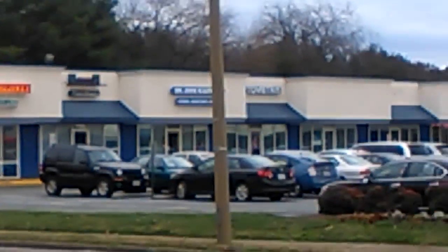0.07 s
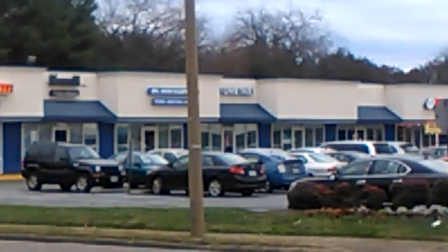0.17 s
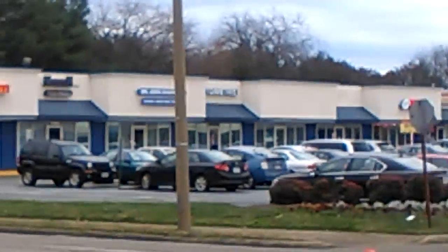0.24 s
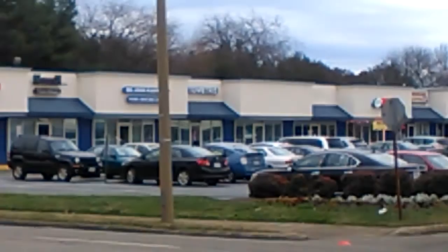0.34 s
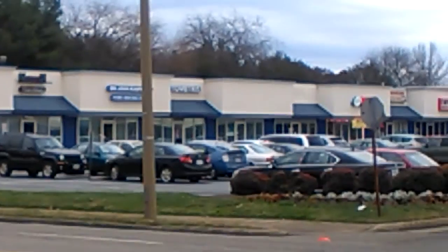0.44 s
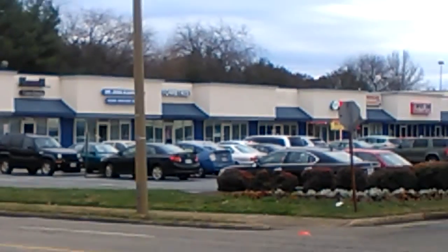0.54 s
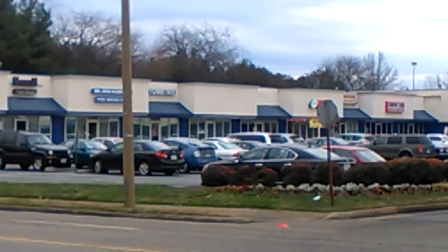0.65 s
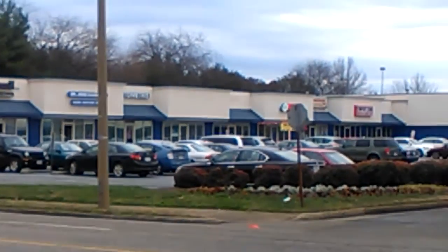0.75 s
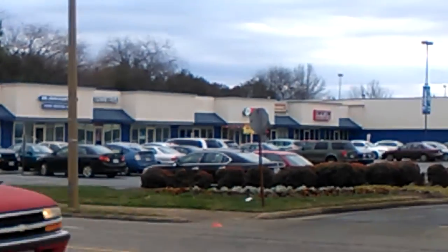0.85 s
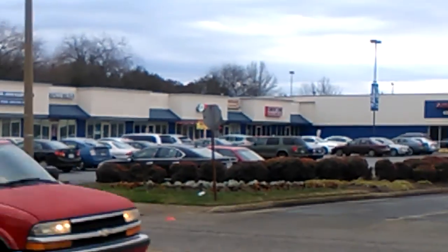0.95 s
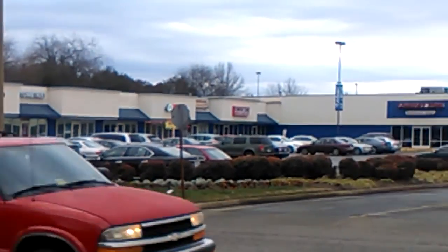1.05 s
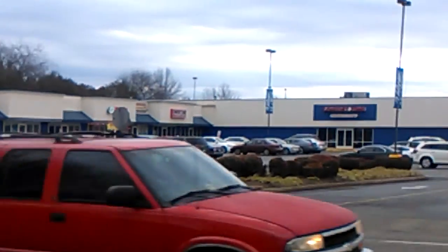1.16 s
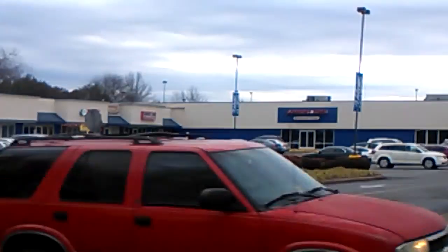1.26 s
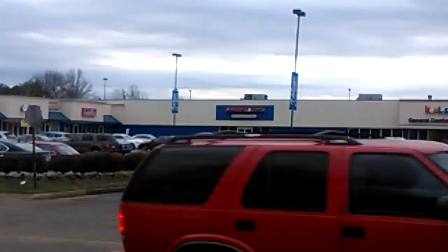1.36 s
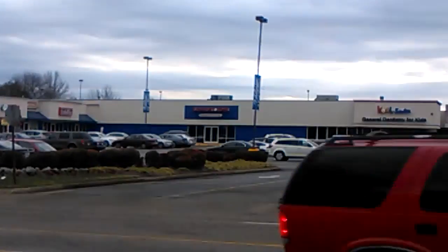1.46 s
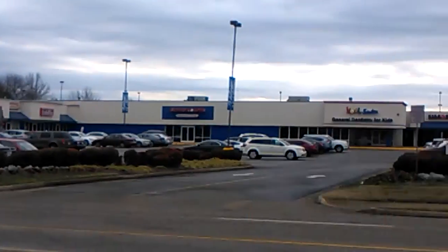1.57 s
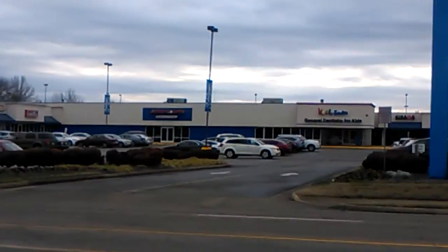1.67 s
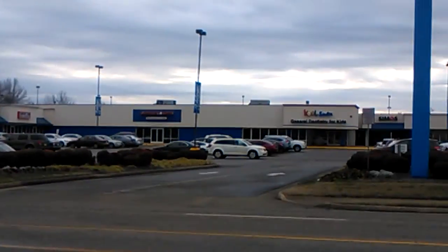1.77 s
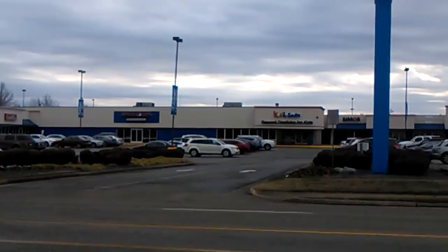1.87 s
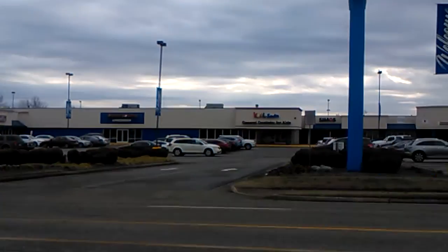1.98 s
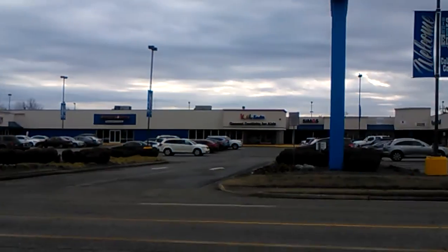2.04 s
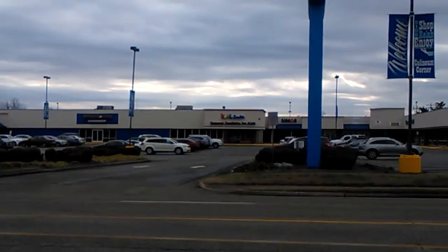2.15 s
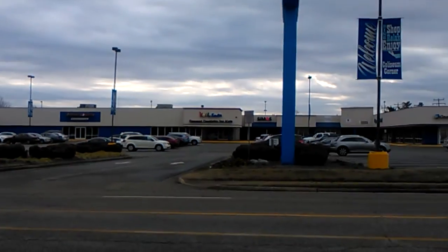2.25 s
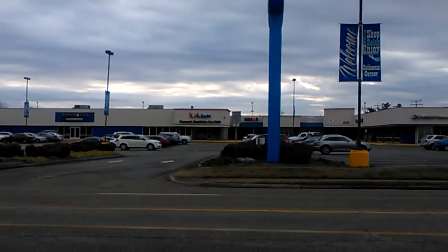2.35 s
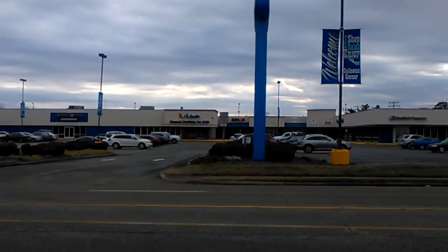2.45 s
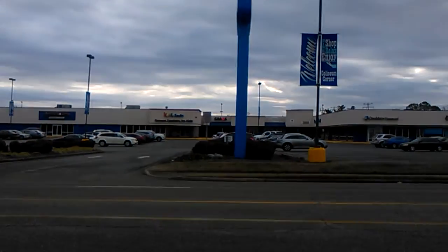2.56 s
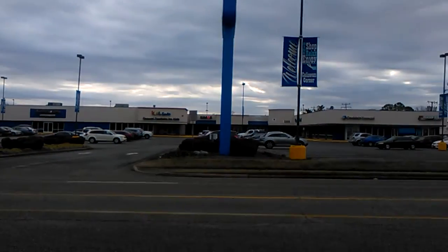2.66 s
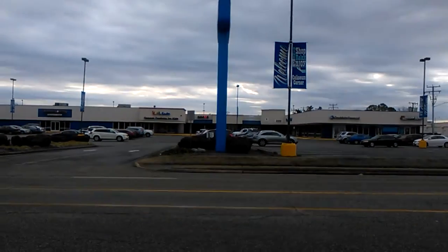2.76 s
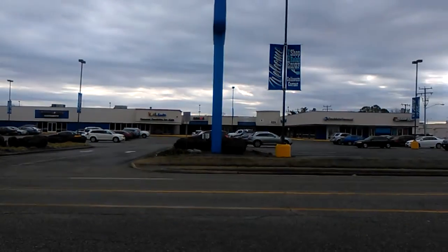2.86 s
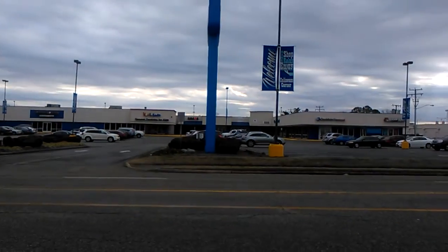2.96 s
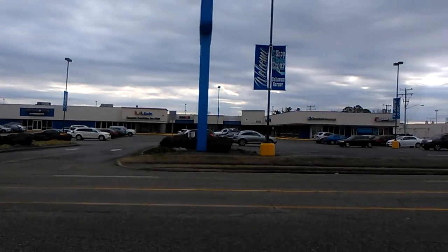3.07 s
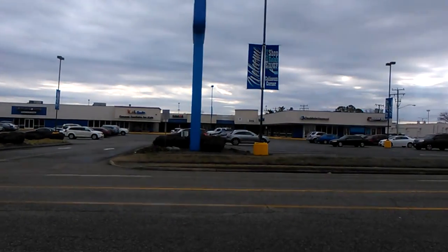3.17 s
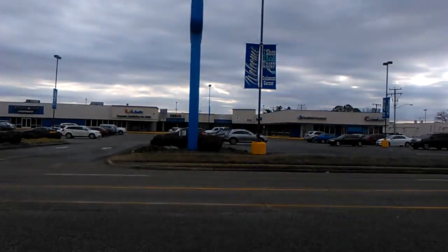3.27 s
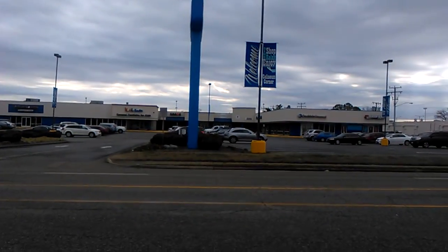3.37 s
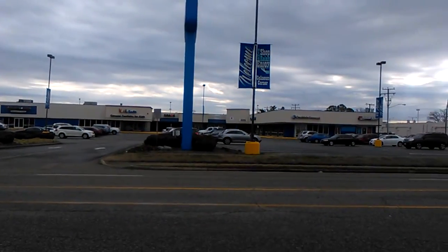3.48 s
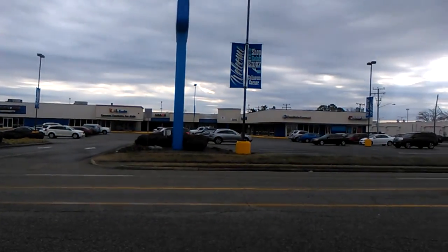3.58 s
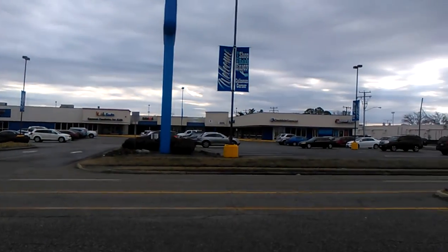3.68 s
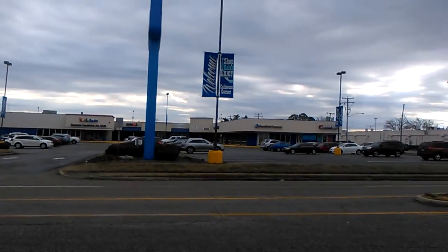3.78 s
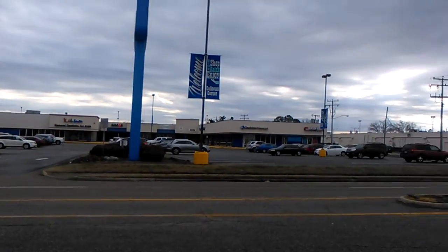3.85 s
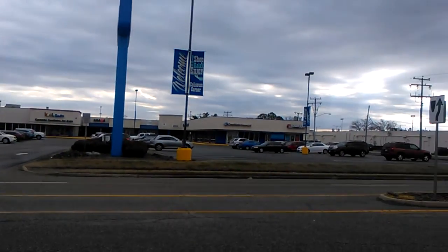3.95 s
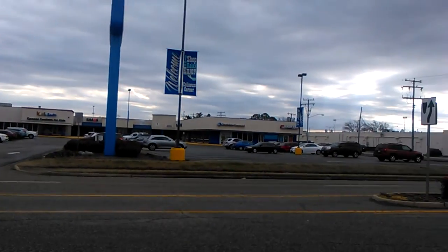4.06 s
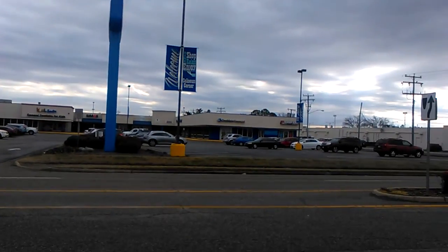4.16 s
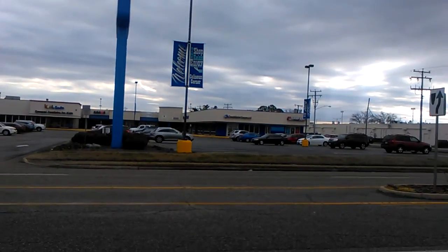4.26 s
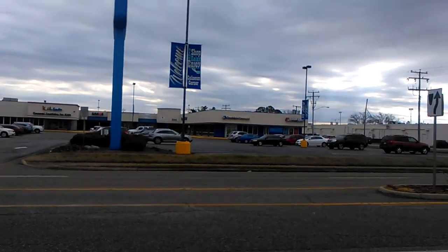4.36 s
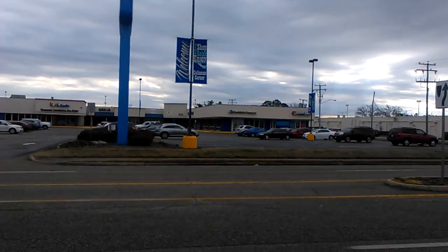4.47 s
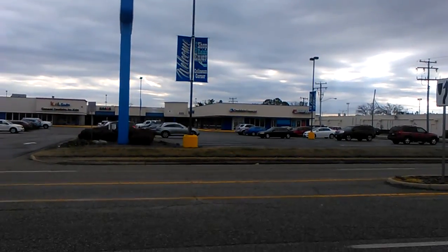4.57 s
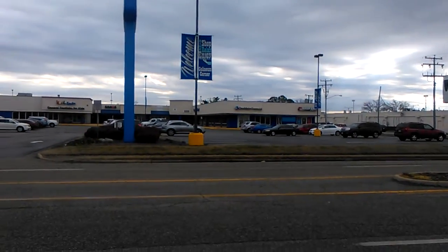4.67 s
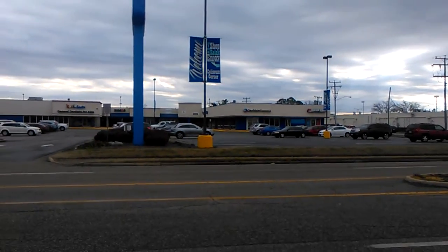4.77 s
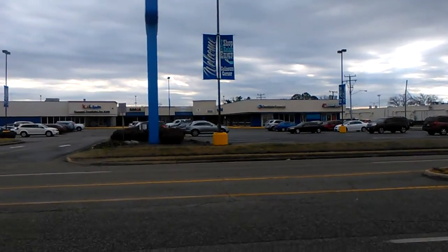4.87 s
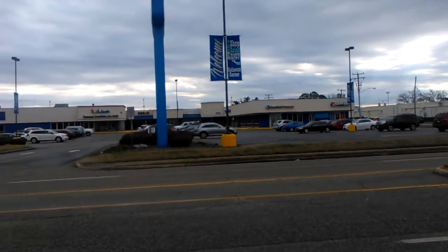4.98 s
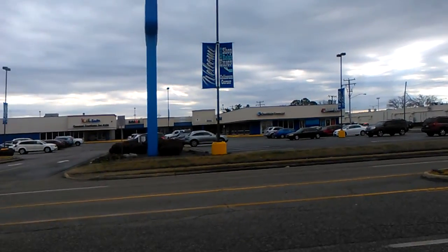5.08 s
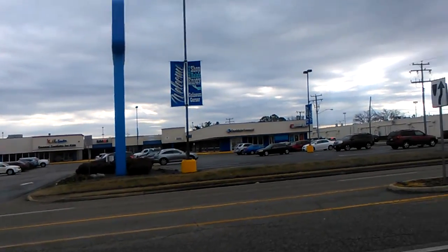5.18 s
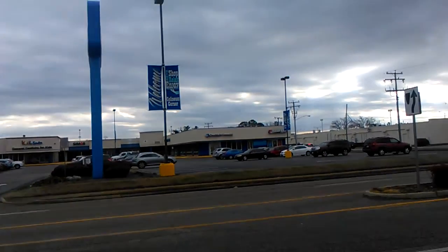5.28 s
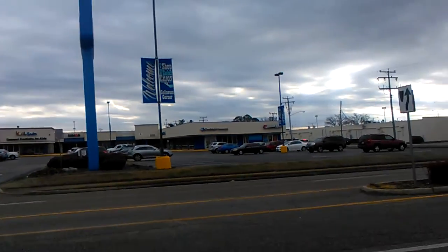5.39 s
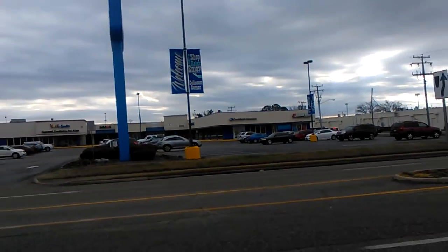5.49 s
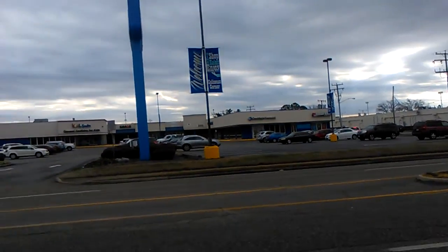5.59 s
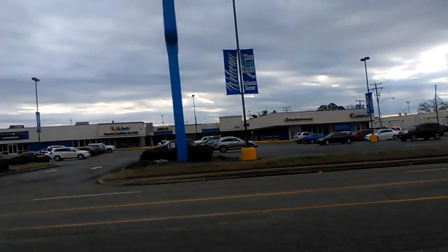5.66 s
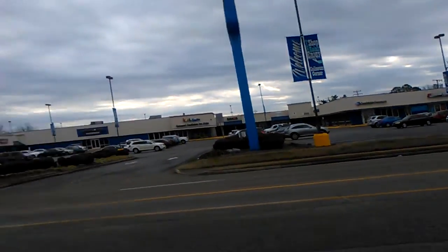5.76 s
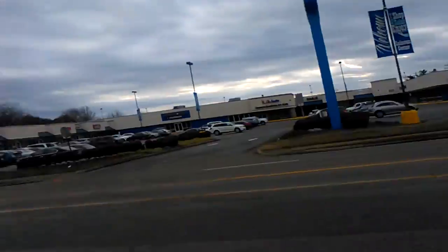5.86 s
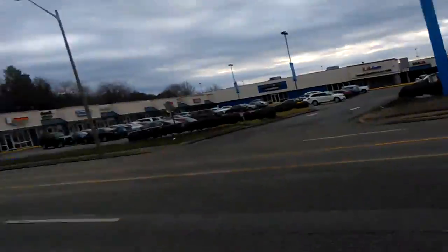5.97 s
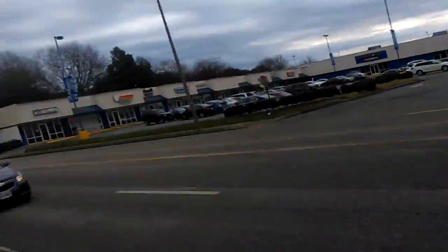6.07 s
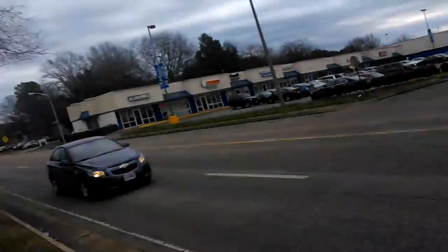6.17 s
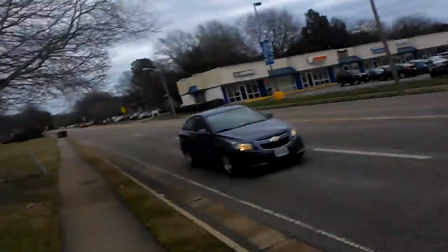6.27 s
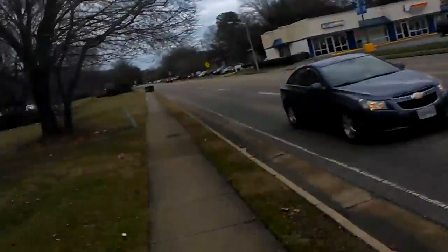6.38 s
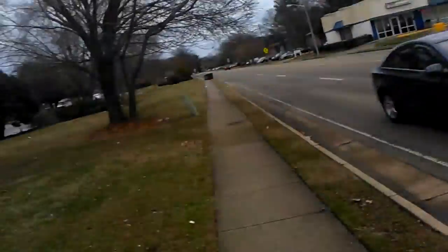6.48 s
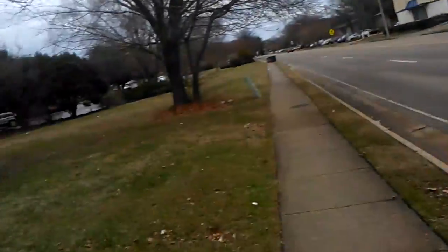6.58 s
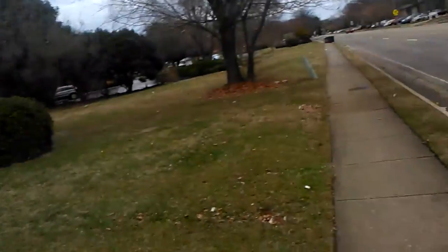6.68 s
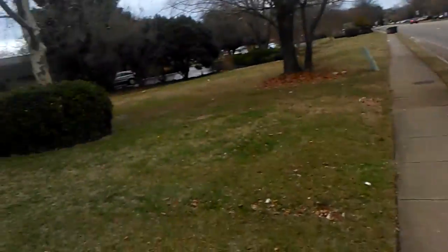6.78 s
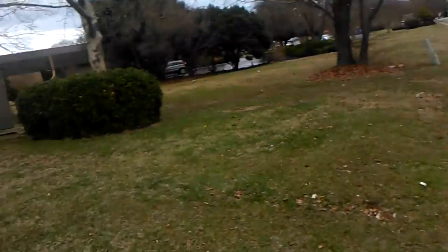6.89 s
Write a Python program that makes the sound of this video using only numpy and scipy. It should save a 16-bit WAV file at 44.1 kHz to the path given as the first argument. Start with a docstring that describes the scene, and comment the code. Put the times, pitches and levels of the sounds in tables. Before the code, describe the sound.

Handheld microphone beside an open multi-lane road. Broad tyre roar with a low engine drone swells, passes and recedes within three seconds. A quiet middle holds soft distant traffic, faint hiss, low thumps and sharp plastic handling ticks. Another vehicle approaches, with brief engine hums, growing into a bright rush that is only just starting to ease when it stops.

```python
"""Tyre roar of two cars passing a hand-held camera at the kerb of a wide road: filtered noise whose spectrum
blends between the sides of each car. The first engine, two harmonically related tones, drops in pitch as it
goes by; the second car's engine hums briefly as it comes near. Bodies and exhausts rumble as low noise.
The camera case ticks as decaying modes, far traffic and a treble hiss are coloured noise,
and the camera electronics whine faintly as steady high tones."""
import sys
import numpy as np
from scipy import signal
from scipy.fft import rfft, irfft, next_fast_len
from scipy.io import wavfile
from scipy.ndimage import uniform_filter1d, map_coordinates

SR = 44100
rng = np.random.default_rng(int(sys.argv[2]) if len(sys.argv) > 2 else 0)


def generate_wav(signal):
    """Clip the signal to [-1, 1] and save it as 16-bit WAV at the path in sys.argv[1]."""
    frames = np.transpose(np.atleast_2d(signal))
    scaled = np.clip(frames, -1, 1) * 32767
    pcm = np.round(scaled).astype(np.int16)
    wavfile.write(sys.argv[1], SR, pcm)


N = 305609
HOP = 128  # samples between spectral frames
T = np.arange(N) / SR
HZ = np.fft.rfftfreq(8 * HOP, 1 / SR)[:, None]
FRAMES = np.arange(N // HOP + 9) * HOP / SR

# Spectral densities below are relative: rush() normalises each to unit power.
# Tyre roar of each car: t/s, level/dB, treble lift/dB (reached in full from 8 kHz up)
FIRST_TYRES = [(0, -27.5, -6.5), (.6, -24.5, -2), (1.05, -22, 1), (1.3, -19.5, -1.5), (1.65, -22.5, -1),
               (1.85, -27.5, 4.5), (2.25, -36, 3.5), (2.55, -37.5, -5.5), (3, -43, -8), (3.3, -53.5, -3)]
SECOND_TYRES = [(3.5, -57.5, 2), (4.2, -43, -7), (4.55, -44.5, 0), (4.9, -39.5, -3.5), (5.2, -37, 0),
                (5.5, -36.5, 2), (5.85, -32.5, 0), (6.1, -25.5, 3.5), (6.35, -24, -1.5), (6.65, -24.5, 4.5),
                (6.93, -27.5, 1.5)]
# Side of the first car heard: t/s, side (0 front, 1 front quarter, 2 flank, 3 rear)
FIRST_TURN = [(.4, 0), (1.1, 1.19), (1.55, 2), (2.2, 3)]
# Side of the second car heard: t/s, side (0 far, 1 front, 2 front quarter, 3 flank)
SECOND_TURN = [(4.2, 0.27), (5.3, 0.41), (5.75, 0.79), (6.1, 1.4), (6.35, 2.05), (6.75, 2.99)]
# Tyre spectra, one list per side in the order above: f/Hz, density/dB per Hz
FIRST_SIDES = [
    [(260, -43), (450, -36), (570, -34), (652, -18), (930, 0), (1430, -10.5), (1810, -6), (2190, -11),
     (2780, -34), (3740, -28.5), (4270, -31), (5340, -25.5), (7180, -37), (8960, -45), (15500, -62)],
    [(260, -46), (450, -17), (596, -15), (802, -6.5), (1110, -0.5), (1560, -14), (2070, -11.5), (2550, -24),
     (3000, -22.5), (3800, -32), (4270, -42), (5030, -36.5), (6760, -34.5), (9510, -51.5), (15500, -62)],
    [(260, -52), (450, -13.5), (554, -18.5), (652, -4), (838, -2.5), (916, -8.5), (1030, -1.5), (1430, -19),
     (2010, -13.5), (2260, -18), (3270, -22.5), (4960, -32), (5580, -28), (6190, -36.5), (15500, -53)],
    [(440, -8), (750, -6.5), (884, -10.5), (1020, 2), (1180, 1), (1580, -7), (1800, -38), (2090, -11),
     (2260, -23), (2500, -17), (3390, -20), (3990, -26), (5480, -23), (6980, -45.5), (15500, -59)],
]
SECOND_SIDES = [
    [(290, -36), (500, -3.5), (629, -4), (706, 4), (803, -1.5), (968, 2.5), (1350, -24.5), (1620, -10.5),
     (1800, -3), (2130, -19), (3190, -23.5), (3630, -29), (5750, -43), (14200, -57), (15500, -56)],
    [(290, -39), (500, -8), (545, -5.5), (686, -12), (716, -6), (769, -10.5), (982, -2), (1150, -7),
     (1620, -2), (2130, -6), (2330, -13), (3100, -32), (3530, -36), (5280, -31.5), (15500, -65)],
    [(290, -38), (500, -28), (611, -28), (726, -12), (1060, -5), (1220, -2.5), (1770, -10.5), (1880, -18),
     (2390, -10), (3100, -32.5), (4250, -39), (4570, -42), (6090, -36.5), (10800, -54), (15500, -56)],
    [(290, -37), (500, -2), (569, -8), (876, 3.5), (1560, -17), (1850, -10.5), (2010, -20), (2290, -10),
     (3280, -22.5), (3580, -24), (3850, -29), (5750, -35.5), (6360, -39.5), (8720, -40), (15500, -66)],
]
# Ripple in the leaving first car's hiss: f/Hz, level/dB
REAR_BANDS = [(2500, 4), (3000, -11), (3500, -2.5), (4000, -6), (4500, 0), (4850, -7), (5200, 0.5),
              (6700, -5)]
# Moving band in each car's hiss, a dark gap where negative: t/s, f/Hz, level/dB
FIRST_GAP = [(0, 4280, -3), (1.2, 4300, -3), (1.45, 5350, -8), (1.6, 6600, -1.5), (2.4, 6800, 4)]
SECOND_GAP = [(4.6, 4760, 3), (5.1, 4470, -9), (5.45, 4750, 2), (5.8, 4500, -12), (6.15, 3500, -6),
              (6.4, 5040, -6), (6.93, 8650, -4)]
# The second car's tread band slides down and is strongest early in the slide
BAND_HIGH_HZ, BAND_LOW_HZ, BAND_MID_S, BAND_GLIDE_S = 1880, 850, 6.3, 0.23
BAND_DB, BAND_PEAK_S, BAND_SWELL_S = 7.5, 6.104, 0.18
# A bright band rides above the second car's gap, at a fixed frequency ratio to it
CREST_OVER_GAP, CREST_DB, CREST_S, CREST_HALF_S = 1.4, 3.5, 6.08, 0.25

# First engine: firing tone before glide and sag, fractional shift either way, middle and width of the glide
FIRING_HZ, DOPPLER, PASS_S, PASS_GLIDE_S, SAG_HZ_PER_S = 96.5, 0.03494, 1.75, 0.25, 2.2
SECOND_ORDER_DB = -1  # over the firing tone
# First engine before its final fade: t/s, level/dB
ENGINE_LEVEL = [(0, -49), (.7, -43.5), (1.44, -32.5), (1.6, -40.5), (2, -35), (2.45, -46.5), (2.75, -43),
                (3, -64), (3.46, -51.5), (4.2, -66)]
# Hums of the second car's engine: t/s, half length/s, f/Hz, glide/(Hz per s), level/dB
HUMS = [(4.05, .35, 62.5, -4, -47), (5.089, .1, 146, -8.5, -48.5), (5.426, 0.048, 153, -5.5, -44.5)]

# Rumble in two layers, drone and deep part: f/Hz, density/dB per Hz
DRONE = [(70, -40), (105, -5), (130, -2.5), (190, -0.5), (240, 1), (330, -6), (420, -11), (520, -15.5),
         (800, -59), (1600, -200)]
DEEP = [(20, -53), (35, -3), (50, 1.5), (65, 4), (100, 5), (130, -22), (200, -79)]
# Brief swells of the rumble: t/s, half length/s, drone level/dB, deep level/dB
THUDS = [(.26, 0.069, -52, -39.5), (2.093, 0.22, -37.5, -42), (4.26, 0.075, -44.5, -46),
         (5.317, 0.23, -42, -42.5), (5.687, 0.14, -41, -38.5), (5.957, 0.039, -35.5, -33.5),
         (6.822, 0.064, -28, -53)]
# Bodies and exhausts over the tyre level: drone/dB, deep part/dB, drone tilt/(dB per octave)
FIRST_BODY, SECOND_BODY = (-9, -15, -1.2), (-11, -16, 7.6)
FAR_DRONE_DB, FAR_DEEP_DB, FAR_TILT_DB = -50.5, -46.5, -4  # far traffic's share, tilt in dB per octave
EXHAUST_LAG_S = 0.16

# Ticks of the case: t/s, level/dB, low modes/dB, high-mode tilt/(dB per octave), crack/dB, crack t60/ms
TICKS = [(2.929, -21, 9, -.5, -17, 9.2), (2.9372, -24.5, -5, -3, -20, 6), (4.4703, -21.5, -12, -17, 4, 3.1)]
# Modes of the plastic case, the first three low: f/Hz, level/dB, t60/s
CASE = [(2800, -5, .012), (3380, 1, .016), (3900, -15, .025), (5370, -6, .007), (6170, -2, .008),
        (7300, -10, .008), (8380, -7, .01), (11000, -11, .006)]

# Far traffic: f/Hz, density/dB per Hz
FAR = [(180, -38), (300, -11), (435, -11), (520, -9), (743, -5.5), (829, -10), (938, -4), (1500, -4.5),
       (2820, -23), (8000, -47), (10400, -80), (17600, -120)]
# Far traffic: t/s, level/dB
FAR_LEVEL = [(0, -50), (3.4, -50), (3.9, -48.5), (4.6, -52), (6.93, -54)]
# Treble hiss: f/Hz, density/dB per Hz
HISS = [(3000, -60), (5000, -1), (7000, 0), (11000, -5.5), (15500, -19)]
# Treble hiss beside each car: t/s, half length/s, level/dB
BESIDE = [(1.48, 0.19, -61), (6.66, 0.18, -60)]
# The treble hiss comes and goes: peak t/s, level/dB, rise/s, time to fall 20 dB/s
PUFFS = [(2.0, -63.5, .2, 1.1), (2.96, -64, .02, 0.16), (3.32, -73, 0.038, 0.6), (3.57, -73.5, 0.097, .3),
         (4.52, -67, .03, 0.2), (4.8, -74, .05, 8), (5.04, -67.5, 0.14, 0.5), (5.35, -67.5, 0.1, 2),
         (5.75, -66, 0.068, .25), (5.93, -64, .07, .5)]
# Whine of the electronics: f/Hz, rms level/dB
WHINE = [(13800, -91), (14000, -87), (14200, -91)]
# Microphone hiss: f/Hz, density/dB per Hz
SELF_NOISE = [(2000, -40), (5000, -7), (15500, -2)]
TOP_HZ = 15850  # band limit


def cars():
    """Superposition: one car's roar fades into the distance while the next draws near."""
    # spectral ripple of the first car sets in as it leaves
    rear = np.clip((FRAMES - 1.9) / 0.47, 0, 1)
    first_extra_db = rear * sum(db * bump(hz, 0.041) for hz, db in REAR_BANDS)
    gap_hz, gap_db = curves(FIRST_GAP, FRAMES)
    first_extra_db = first_extra_db + gap_db * bump(gap_hz, 0.076)

    slide = (1 + np.tanh((FRAMES - BAND_MID_S) / BAND_GLIDE_S)) / 2
    band_hz = BAND_HIGH_HZ * (BAND_LOW_HZ / BAND_HIGH_HZ) ** slide
    band_db = BAND_DB * bell(FRAMES, BAND_PEAK_S, BAND_SWELL_S)
    gap_hz, gap_db = curves(SECOND_GAP, FRAMES)
    crest_db = CREST_DB * bell(FRAMES, CREST_S, CREST_HALF_S)
    second_extra_db = band_db * bump(band_hz, 0.17) + gap_db * bump(gap_hz, 0.12)
    second_extra_db = second_extra_db + crest_db * bump(CREST_OVER_GAP * gap_hz, 0.16)

    first_gain, second_gain = nearness(T)
    first = first_gain * tyres(FIRST_TYRES, FIRST_TURN, FIRST_SIDES, first_extra_db)
    second = second_gain * tyres(SECOND_TYRES, SECOND_TURN, SECOND_SIDES, second_extra_db)
    return first + second


def tyres(level, turn, sides, extra_db):
    """Directivity: tread noise has a spectrum for each side of the car, blended in dB as the car turns by."""
    side, = curves(turn, FRAMES)
    side = np.clip(side, 0, len(sides) - 1)
    colour_db = sum(along(s, HZ) * np.clip(1 - abs(side - k), 0, 1) for k, s in enumerate(sides))
    lift_db = curves(level, FRAMES)[1] * along([(2500, 0), (8000, 1.0), (15500, 1.0)], HZ)
    flutter_db = 0.78 * wobble(9) + 0.71 * wobble(25)
    return amp(flutter_db) * rush(colour_db + lift_db + extra_db, patchy_db=1.0, streaky_db=1.5)


def first_engine():
    """Doppler effect: a six-cylinder firing order and, two thirds as high, the second shaft order glide down."""
    shift = 1 - DOPPLER * np.tanh((T - PASS_S) / PASS_GLIDE_S)
    hz = (FIRING_HZ - SAG_HZ_PER_S * (T - PASS_S)) * shift
    phase = 2 * np.pi * np.cumsum(hz * (1 + 0.0033 * wobble(8.6))) / SR
    firing = amp(2.2 * wobble(7.07)) * np.sin(phase)
    second_order = amp(SECOND_ORDER_DB + 1.4 * wobble(6.3)) * np.sin(phase * 2 / 3)
    fade = np.clip((4.5 - T) / 0.43, 0, 1)
    return np.sqrt(2) * amp(curves(ENGINE_LEVEL, T)[0]) * fade * (firing + second_order)


def second_engine():
    """Frequency modulation: each brief hum is a swelling sine with a gliding, unsteady pitch."""
    out = np.zeros(N)
    for s, half_s, hz, glide, db in HUMS:
        pitch = (hz + glide * (T - s)) * (1 + 0.0149 * wobble(7.5))
        gain = bell(T, s, half_s) * amp(db + 1.4 * wobble(5.95))
        out += gain * np.sin(2 * np.pi * np.cumsum(pitch) / SR)
    return np.sqrt(2) * out


def rumble():
    """Incoherent power addition: low noise of bodies, exhausts, far traffic and brief swells in two layers."""
    near = nearness(T - EXHAUST_LAG_S)  # a little late, since exhausts point back
    swells = [bell(T, s, half_s) for s, half_s, _, _ in THUDS]
    gains = []
    for k, far_db in enumerate([FAR_DRONE_DB, FAR_DEEP_DB]):
        bodies = [g * amp(body[k]) for g, body in zip(near, [FIRST_BODY, SECOND_BODY])]
        thuds = [g * amp(row[2 + k]) for g, row in zip(swells, THUDS)]
        gains.append(together(bodies + [amp(far_db)] + thuds))
    drone_gain, deep_gain = gains

    first, second = nearness(FRAMES)
    far = amp(-42.0)  # tyre level at which a car's colour takes over from far traffic
    tilt = first * FIRST_BODY[2] + second * SECOND_BODY[2] + far * FAR_TILT_DB
    tilt = tilt / (first + second + far)
    drone_db = along(DRONE, HZ) + tilt * np.log2((HZ + 1) / 220)
    lumps_db = 0.9 * wobble(13) + 0.6 * wobble(4.5)
    drone = amp(lumps_db) * rush(drone_db, patchy_db=1.84)
    deep = rush(along(DEEP, HZ), patchy_db=0.5)
    return drone_gain * drone + deep_gain * deep


def ticks():
    """Modal decay: a noise crack, ringing modes of the plastic case and a faint return from the surroundings."""
    out, t = np.zeros(N + SR), np.arange(SR // 4) / SR
    slow = 1 - np.exp(-(t / 0.0026) ** 2)  # the low modes build up later
    fast = 1 - np.exp(-t / 0.0009)
    for s, db, low_db, tilt_db, crack_db, crack_ms in TICKS:
        low = sum(mode(t, hz, level, t60) for hz, level, t60 in CASE[:3])
        high = sum(mode(t, hz, level + tilt_db * np.log2(hz / 6000), t60) for hz, level, t60 in CASE[3:])
        crack = amp(crack_db - 60 * t / crack_ms * 1000) * np.diff(rng.standard_normal(len(t) + 1))
        echo = amp(-31 - 60 * t / 0.1) * uniform_filter1d(rng.standard_normal(len(t)), size=5)
        tick = amp(low_db) * slow * low + fast * (high + crack) + echo
        out[round(s * SR):][:len(t)] += amp(db) * tick
    return out[:N]


def mode(t, hz, level_db, t60):
    """Damped resonance: a sine that decays by 60 dB in t60 seconds."""
    return amp(level_db - 60 * t / t60) * np.sin(2 * np.pi * hz * t)


def far_traffic():
    """Superposition of many distant sources, modelled as patchy, streaky coloured noise."""
    return amp(curves(FAR_LEVEL, T)[0]) * rush(along(FAR, HZ), patchy_db=2.0, streaky_db=3.5)


def treble_hiss():
    """Amplitude modulation: high noise swells beside each car and in puffs of quick or slow decay."""
    gains = [amp(db) * bell(T, s, half_s) for s, half_s, db in BESIDE]
    for s, db, rise_s, fall_s in PUFFS:
        fall_db = 20 * np.clip(T - s, 0, None) / fall_s
        gains.append(amp(db - fall_db) * bell(np.minimum(T, s), s, rise_s))
    return together(gains) * amp(0.9 * wobble(30)) * rush(along(HISS, HZ), patchy_db=3.5)


def electronic_whine():
    """Narrow-band tones: high sines whose level and phase waver slightly."""
    out = np.zeros(N)
    for hz, db in WHINE:
        gain = np.sqrt(2) * amp(db + 1.5 * wobble(5))
        out += gain * np.sin(2 * np.pi * hz * T + 0.85 * wobble(13))
    return out


def nearness(t):
    """Distance as level: tyre gain of the two cars, the first fading out and the second fading in."""
    leaving, coming = np.clip((3.7 - t) / 0.5, 0, 1), np.clip((t - 3.3) / 0.5, 0, 1)
    return leaving * amp(curves(FIRST_TYRES, t)[0]), coming * amp(curves(SECOND_TYRES, t)[0])


def rush(colour_db, patchy_db, streaky_db=0):
    """Spectral shaping: noise of nominal rms 1, coloured per frame, with short random patches and long streaks."""
    z = signal.stft(rng.standard_normal(N + 8 * HOP), nperseg=8 * HOP, noverlap=7 * HOP)[2][:, :len(FRAMES)]

    def field(bins, frames):
        """Moving average: a random gain pattern of rms 1, smooth over the given bins and frames."""
        over_bins = uniform_filter1d(rng.standard_normal(z.shape), bins, 0)
        return unit(uniform_filter1d(over_bins, frames, 1))

    gain = amp(colour_db)
    gain = gain / np.sqrt(np.mean(gain ** 2, axis=0))
    chance_db = patchy_db * field(8, 20) + streaky_db * field(4, 120)
    return signal.istft(z * gain * amp(chance_db), nperseg=8 * HOP, noverlap=7 * HOP)[1][:N]


def wobble(rate):
    """Random modulation: a smooth curve through normal random knots, rate knots a second."""
    return map_coordinates(rng.standard_normal(int(N * rate / SR) + 4), [np.arange(N) * rate / SR])


def bump(hz, octaves):
    """Resonance shape: a bell on the log frequency axis."""
    return np.exp(-0.5 * (np.log2((HZ + 1) / hz) / octaves) ** 2)


def bell(t, centre_s, half_s):
    """Gaussian envelope: a smooth swell in time."""
    return np.exp(-0.5 * ((t - centre_s) / half_s) ** 2)


def together(gains):
    """Power addition: gain of unrelated noises heard at once."""
    return np.sqrt(sum(g ** 2 for g in gains))


def amp(db):
    """Decibel definition: dB to amplitude gain."""
    return 10 ** (np.asarray(db) / 20)


def unit(x):
    """Root mean square: x scaled to rms 1."""
    return x / np.sqrt(np.mean(x ** 2) + 1e-20)


def along(points, hz):
    """Interpolation of (f/Hz, value) points on a log frequency axis."""
    f, v = np.transpose(points)
    return np.interp(np.log(hz + 1), np.log(f + 1), v)


def curves(rows, t):
    """Linear interpolation: each column after the time, read at the times t."""
    s, *cols = np.transpose(rows)
    return [np.interp(t, s, c) for c in cols]


def scene():
    """Linear superposition: all sources add at the one microphone."""
    vehicles = cars() + first_engine() + second_engine() + rumble()
    return (vehicles + ticks() + far_traffic() + treble_hiss() + electronic_whine())[None]


def record(dry):
    """Band limiting: the microphone adds hiss, cuts the deepest bass and keeps nothing above TOP_HZ."""
    m = next_fast_len(N + SR // 4)
    hz = np.fft.rfftfreq(m, 1 / SR)
    top_cut = np.clip((TOP_HZ - hz) / 300, 0, 1)
    bass_cut = 1 / np.sqrt(1 + (42 / (hz + 1)) ** 10)
    heard = dry + amp(-78.5) * rush(along(SELF_NOISE, HZ), patchy_db=0.0)
    return irfft(rfft(heard, m) * top_cut * bass_cut, m)[:, :N]


dry = scene()
out = record(dry)
generate_wav(out)
```